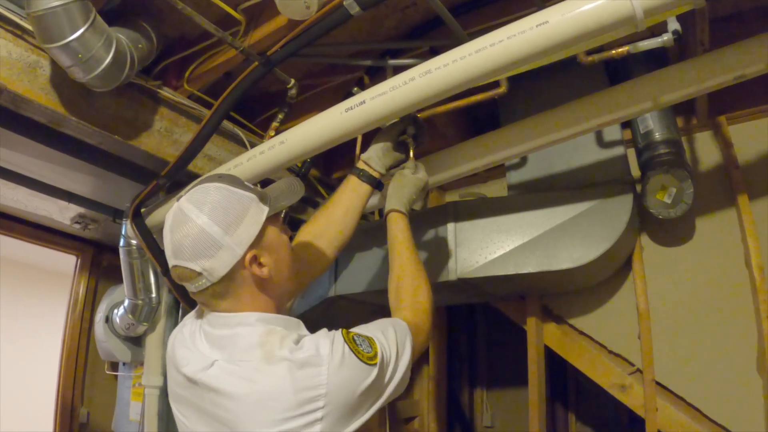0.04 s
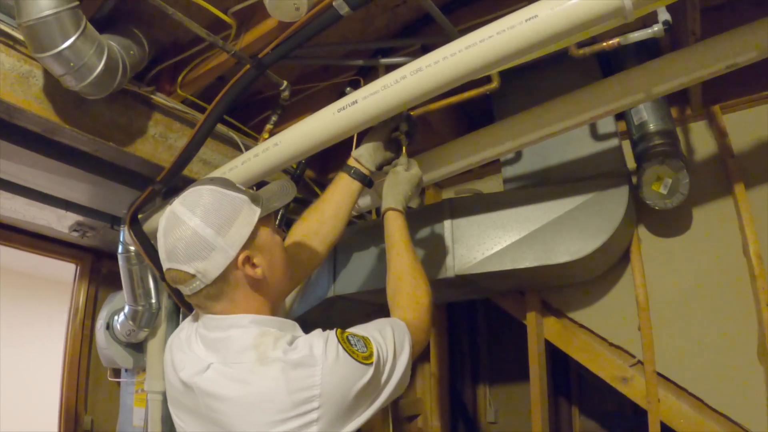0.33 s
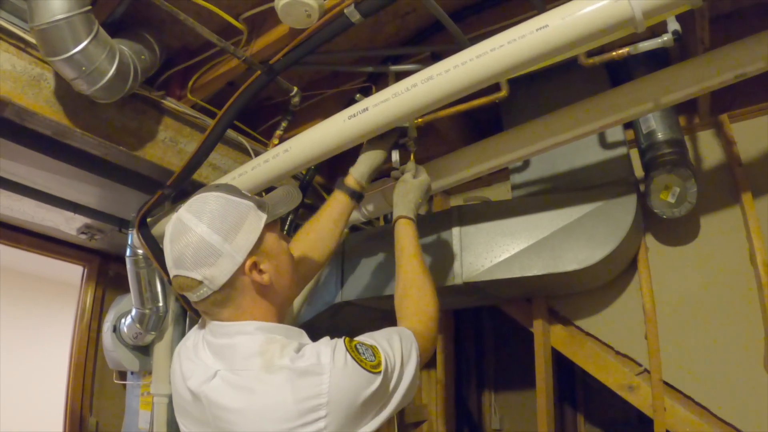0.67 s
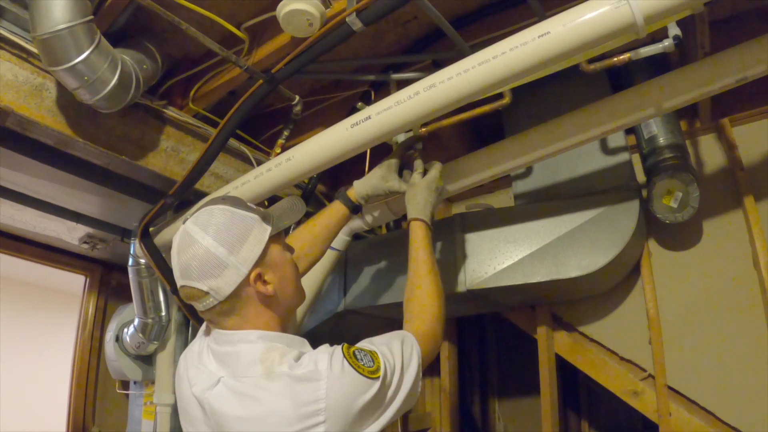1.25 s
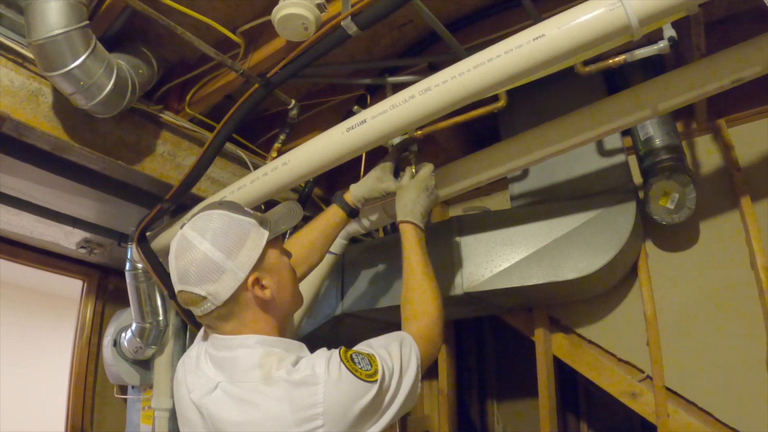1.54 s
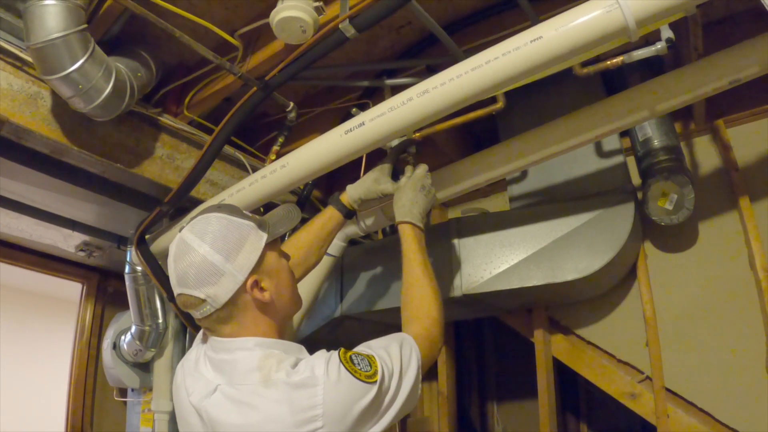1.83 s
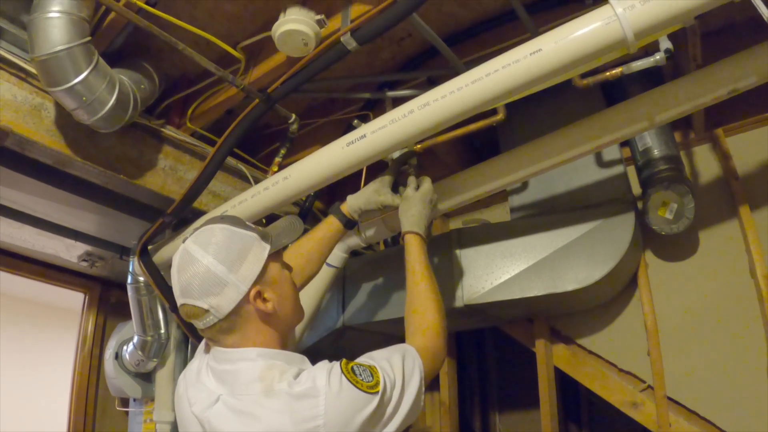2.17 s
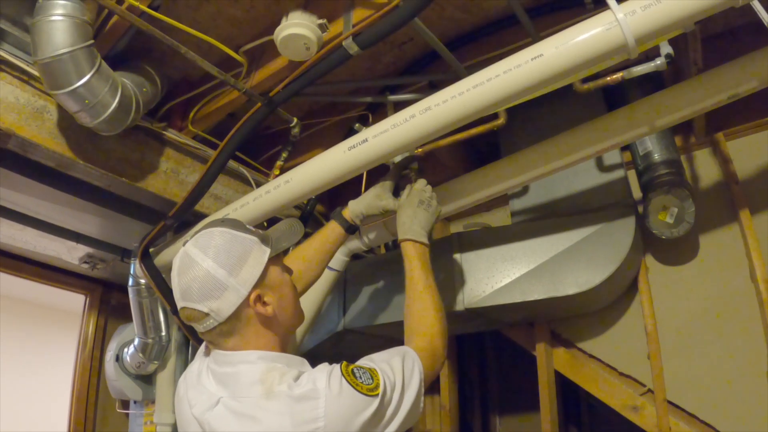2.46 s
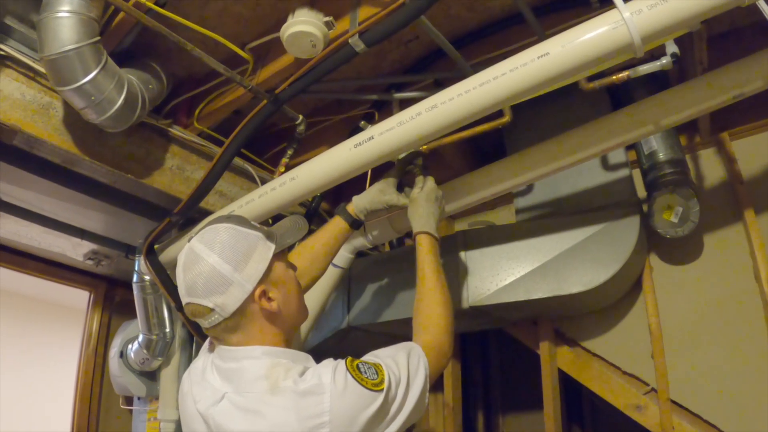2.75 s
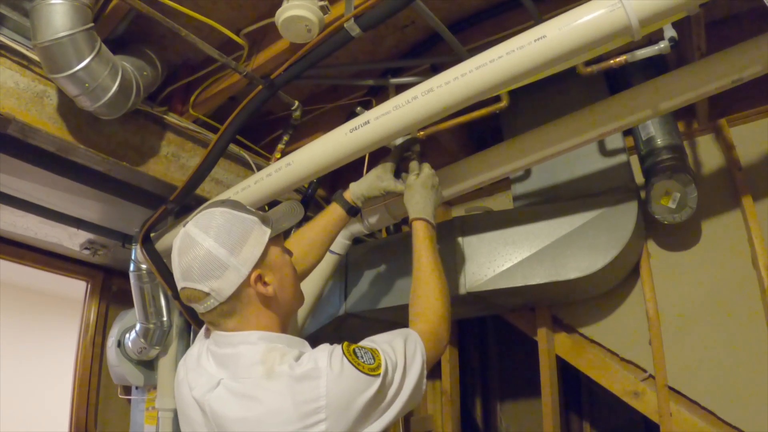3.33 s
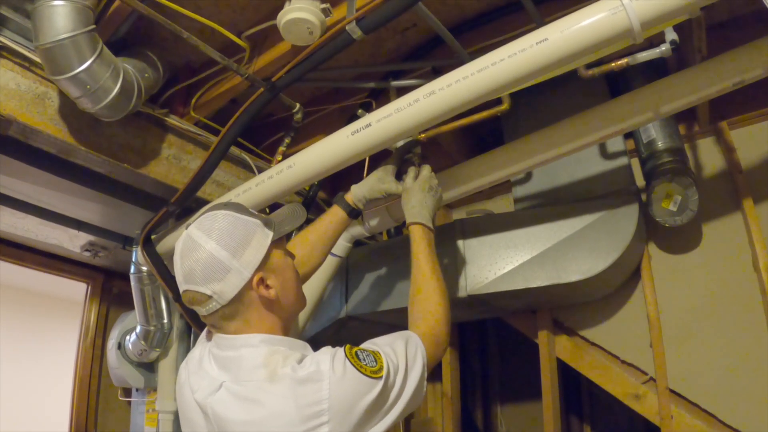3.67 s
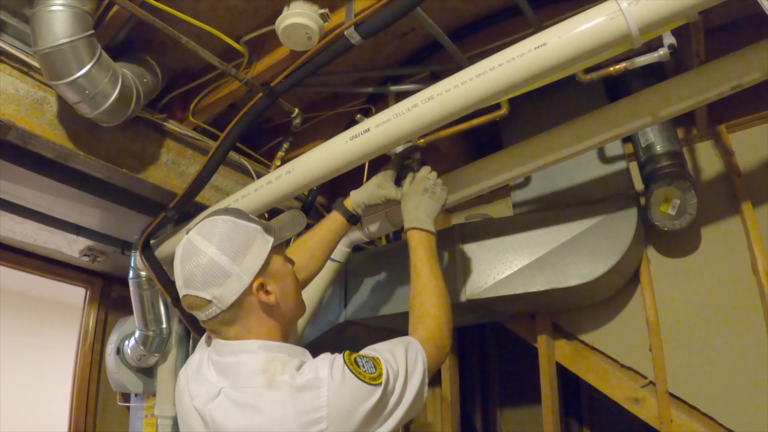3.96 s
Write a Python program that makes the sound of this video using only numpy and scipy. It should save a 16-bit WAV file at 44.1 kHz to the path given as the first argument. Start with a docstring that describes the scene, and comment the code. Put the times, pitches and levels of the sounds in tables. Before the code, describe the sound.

A loud, clattering thump hits a sheet-metal duct at about 0.1 seconds and booms away in a basement. Around 0.7 seconds a pipe fitting scrapes and clicks, then snaps with a sharp clack near 0.9. From about 1.5 to 3.7 seconds, faint hollow pipe bumps and glove rustle come and go, with soft, deep duct flexes near 2.7 and 3.2. Faint hum and hiss continue throughout.

```python
"""Pipe work beside a basement duct.

Gloved hands work on a pipe fitting. A sheet-metal duct takes one loud clattering thump and booms on
in its panels and modes; the fitting scrapes, then snaps with a sharp clack. The pipe shifts, its slips
ringing as dull, hollow bumps, while gloves rustle and a duct panel flexes, over a faint hum and hiss."""
import sys
import numpy as np
from scipy import signal
from scipy.io import wavfile
from scipy.ndimage import uniform_filter1d

SR = 44100
rng = np.random.default_rng(int(sys.argv[2]) if len(sys.argv) > 2 else 0)


def dump_mix(stems):
    """Bounce the given channels to the path in sys.argv[1] as a 16-bit WAV at rate SR."""
    frames = np.atleast_2d(stems).T  # one column per channel
    limited = np.clip(frames, -1, 1)  # hard clip at full scale
    pcm = np.round(limited * 32767).astype(np.int16)
    wavfile.write(sys.argv[1], SR, pcm)


N = 176400
TIME_S = np.arange(N) / SR


def from_db(db):
    """Decibels to gain."""
    return 10 ** (np.asarray(db) / 20)


def unit_rms(x):
    """Scale to rms 1."""
    return x / np.sqrt(np.mean(x ** 2) + 1e-20)


def evened(x, window_s=0.026):
    """Hold the running rms at 1."""
    return x / np.sqrt(np.abs(uniform_filter1d(x ** 2, int(window_s * SR))) + 1e-20)


def at_hz(table, hz):
    """Interpolate on a log-frequency axis."""
    freqs_hz, values = np.transpose(table)
    return np.interp(np.log(hz), np.log(freqs_hz), values)


def low_cut(x, hz):
    """Cut the deep bass below hz."""
    return signal.sosfilt(signal.butter(4, hz, "high", fs=SR, output="sos"), x)


def noise_bands(size):
    """Third octaves of white noise: yields (centre [Hz], signal)."""
    edges_hz = 28 * 2 ** (np.arange(29) / 3)
    white = rng.standard_normal((2, size + SR // 2))
    for k, (lo, hi) in enumerate(zip(edges_hz, edges_hz[1:])):
        sos = signal.butter(3, [lo, hi], "band", fs=SR, output="sos")
        yield np.sqrt(lo * hi), signal.sosfilt(sos, white[k % 2])[-size:]


def noise(spectrum):
    """Steady coloured noise, rms 1."""
    return unit_rms(sum(from_db(at_hz(spectrum, hz)) * band for hz, band in noise_bands(N)))


def swells(events, attack_s, release_s):
    """Rise, hold and decay for each (time [s], length [s], level [dB])."""
    envelope = 0
    for start_s, length_s, db in events:
        t = TIME_S - start_s
        rise = np.clip(t / attack_s, 0, 1)
        decay = np.exp(-np.maximum(t - length_s, 0) / release_s)
        envelope += from_db(db) * rise * decay
    return envelope


def ring(drive, hz, t60_s):
    """One mode: a unit click starts a decaying sine of height 1."""
    r = from_db(-60 / (t60_s * SR))
    w = 2 * np.pi * hz / SR
    return signal.lfilter([0, np.sin(w)], [1, -2 * r * np.cos(w), r * r], drive + 1e-18)


def contact(time_s, db, brightness_hz):
    """One push; softer contacts hold fewer highs."""
    click = np.zeros(N)
    click[int(time_s * SR)] = from_db(db)
    return signal.sosfilt(signal.butter(2, brightness_hz, fs=SR, output="sos"), click + 1e-18)


# Basement decay: (frequency [Hz], T60 [s])
BASEMENT_T60 = [(80, 1.5), (180, 1.63), (350, 0.91), (700, 0.9), (1400, 0.49), (2800, 0.32), (6000, 0.29),
                (12000, 0.33)]

def struck_response(spectrum, crack_db, crack_s, t60_scale=1.0):
    """A struck body in the room: short crack, then a dense tail dying band by band; energy 1."""
    t = TIME_S[:2 * SR]
    out = 0
    for hz, band in noise_bands(len(t)):
        tail = from_db(-60 * t / (t60_scale * at_hz(BASEMENT_T60, hz)))
        hand_shadow = 1 / (1 + (hz / 6500) ** 2)  # the hands dull the direct path
        crack = from_db(crack_db) * np.exp(-t / crack_s) * hand_shadow
        decaying = unit_rms(evened(band) * (tail + crack))
        out += from_db(at_hz(spectrum, hz)) * np.sqrt(hz) * decaying
    return out / np.linalg.norm(out)


# Room hiss: (frequency [Hz], relative density [dB])
HISS_SPECTRUM = [(15, -41), (25, -21), (37, -11.5), (58, -3.5), (87, -15), (113, -2), (231, -5.5),
                 (382, -10), (414, -9), (498, -16), (599, -9), (1330, -6.5), (1920, -11.5), (4730, -24.5),
                 (14000, -45.5)]
# Hum: (frequency [Hz], rms level [dB])
HUM_TONES = [(50.3, -71), (59.6, -78)]

def room_tone(hiss_db=-58):
    """Faint hiss and two low tones that beat."""
    hum = 0
    for hz, db in HUM_TONES:
        hum += from_db(db) * np.sqrt(2) * np.sin(2 * np.pi * (hz * TIME_S + rng.random()))
    return from_db(hiss_db) * noise(HISS_SPECTRUM) + hum


# Handling rumbles: (time [s], length [s], level [dB])
RUMBLE_EVENTS = [(0, 0.27, -51.5), (0.428, 0.2, -55), (0.725, 0.16, -46), (0.937, 0.074, -55),
                 (2.695, .05, -54.5), (3.676, .03, -60.5)]
# Rumble: (frequency [Hz], relative density [dB])
RUMBLE_SPECTRUM = [(50, -50), (85, -15), (120, 3.5), (175, 1.5), (350, -5), (700, -13.5), (2000, -62)]
HAND_ATTACK_S, HAND_RELEASE_S = 0.014, 0.073

def handling_rumble():
    """Handling makes swells of low noise."""
    envelope = swells(RUMBLE_EVENTS, HAND_ATTACK_S, HAND_RELEASE_S)
    return low_cut(envelope * noise(RUMBLE_SPECTRUM), hz=90)


# Glove slides: (time [s], length [s], level [dB])
GLOVE_RUBS = [(.015, .08, -54.5), (.585, 0.092, -60.5), (.76, 0.051, -44.5), (1.22, 0.031, -65),
              (1.71, 0.12, -65.5), (2.74, 0.034, -68), (3.33, 0.046, -68), (3.82, .05, -66)]
# Glove friction: (frequency [Hz], relative density [dB])
GLOVE_SPECTRUM = [(100, 11.5), (250, 8), (700, 0.5), (1400, 5), (2700, 0), (5000, -9.5), (8000, -20.5),
                  (11000, -21.5), (14000, -55)]

def glove_rustle():
    """Gloves rub over the fitting, and again at each shift of the pipe."""
    pipe_rubs = [(time_s, length_s, rub_db) for time_s, length_s, _, _, rub_db in PIPE_SHIFTS]
    return swells(GLOVE_RUBS + pipe_rubs, HAND_ATTACK_S, HAND_RELEASE_S) * noise(GLOVE_SPECTRUM)


# Blows on the duct: (time [s], level [dB], brightness [Hz])
DUCT_BLOWS = [(.0915, -7.5, 6000), (0.0972, 1, 4570), (0.1093, 3, 1280), (.123, -5.5, 2520),
              (.138, -4, 990), (0.17, -8.5, 200), (.19, -5.5, 600), (.256, -10, 557), (.735, -29, 205),
              (.778, -15.5, 280), (.797, -16.5, 260), (.96, -30, 169)]
# Dense panel vibration: (frequency [Hz], relative density [dB])
PANEL_SPECTRUM = [(50, -48), (85, -30), (130, -12), (200, -3), (350, 2.5), (600, -6.5), (750, -4.5),
                  (1100, -7.5), (1800, -7.5), (3500, -14.5), (5200, -22.5), (7500, -31.5), (11000, -33),
                  (14000, -44)]
# Duct modes: (frequency [Hz], relative peak [dB], T60 [s])
DUCT_RESONANCES = [(124.9, 0, 0.49), (192.9, -5, 1.4), (237.3, 0.5, 0.74), (261.4, -1.5, .9),
                   (318, 2, 0.45), (336, 10.5, .65), (370.5, 4.5, 0.87), (443.6, -0.5, .95),
                   (489, -2, 0.66), (554, 1, 0.46), (676.4, 0.5, 0.65), (708, 6, .45), (786, 5.5, 0.23),
                   (912, -7, 0.3), (983, -1, 0.43), (1106, 1, 0.25), (1256, 2, 0.25), (1454, -0.5, .3),
                   (1811, 1, 0.23)]
# Mode build-up: (frequency [Hz], time constant [s])
DUCT_RISE = [(125, 0.015), (200, 0.004), (320, 0.00066)]

def duct_thump(panels_db=7.5, modes_db=-35.5, max_travel_s=0.006):
    """Blows shake the panels; bending waves reach each mode, and the low modes build up slowest."""
    pushes = np.array([contact(*blow) for blow in DUCT_BLOWS])
    response = struck_response(PANEL_SPECTRUM, crack_db=0, crack_s=0.035)
    panels = signal.fftconvolve(pushes.sum(0), response)[:N]
    signs = rng.choice([-1, 1], (len(DUCT_BLOWS), len(DUCT_RESONANCES)))
    modes = 0
    for k, (hz, db, t60_s) in enumerate(DUCT_RESONANCES):
        delay_samples = int(rng.random() * max_travel_s * SR)
        drive = np.roll(signs[:, k] @ pushes, delay_samples)
        rise_t60_s = np.log(1000) * at_hz(DUCT_RISE, hz)
        tone = ring(drive, hz, t60_s) - ring(drive, hz, rise_t60_s)
        modes += from_db(db) * tone / np.abs(tone).max()
    return low_cut(from_db(panels_db) * panels + from_db(modes_db) * modes, hz=104)


# Fitting scrapes: (time [s], length [s], level [dB])
SCRAPE_EVENTS = [(.6, 0.055, -69), (0.736, 0.029, -63.5), (0.761, .035, -54)]
# Scrape: (frequency [Hz], relative density [dB])
SCRAPE_SPECTRUM = [(500, -27), (2000, 2), (4000, 5), (6500, 0), (8500, -5), (11000, -14.5), (14000, -20)]

def fitting_scrape():
    """Bright friction noise before the snap."""
    return swells(SCRAPE_EVENTS, attack_s=0.013, release_s=0.018) * noise(SCRAPE_SPECTRUM)


# Catches and snap: (time [s], level [dB], brightness [Hz])
FITTING_CLICKS = [(.7565, -17, 12000), (.762, -11, 7900), (.771, -25, 8940), (.7795, -18, 10330),
                  (.787, -20, 10100), (.796, -19, 5974), (.867, -3.5, 7940), (0.8701, -13, 11900)]
# Fitting body: (frequency [Hz], relative density [dB])
FITTING_SPECTRUM = [(200, -26), (500, -4), (1100, -4.5), (1900, 0), (3400, -3), (4700, -6.5), (6500, -10.5),
                    (8200, -21), (9500, -16), (14000, -31)]
# Fitting modes: (frequency [Hz], relative level [dB], T60 [s])
FITTING_RESONANCES = [(1680, 7, .2), (2070, 4, 0.24), (2280, -6, .2), (2550, 7, 0.16), (3350, 4, 0.17),
                      (3960, 8, 0.16), (4580, -4, 0.2), (5750, -11, .18)]

def fitting_clack(body_db=-4, modes_db=-57):
    """A run of small catches, then the snap; each rings the metal."""
    pushes = sum(contact(*click) for click in FITTING_CLICKS)
    response = struck_response(FITTING_SPECTRUM, crack_db=7, crack_s=0.0042, t60_scale=0.93)
    body = signal.fftconvolve(pushes, response)[:N]
    modes = sum(from_db(db) * ring(pushes, hz, t60_s) for hz, db, t60_s in FITTING_RESONANCES)
    return from_db(body_db) * body + from_db(modes_db) * modes


# Pipe bumps: (time [s], length [s], level [dB], upper-mode offset [dB], glove rub [dB])
PIPE_SHIFTS = [(1.457, .05, -65, -14, -77), (1.751, 0.036, -60.5, 4.5, -56),
               (2.034, 0.045, -46.5, -14, -58), (2.444, 0.061, -57, -13.5, -82),
               (2.513, 0.051, -49.5, -12, -67), (2.609, 0.033, -53.5, -0.5, -55),
               (2.645, 0.056, -48.5, -5.5, -64), (2.849, 0.033, -62, -13, -65),
               (3.133, 0.065, -62.5, 0.5, -57.5), (3.648, 0.022, -70, -8, -60)]
# Hollow modes, lowest first: (frequency [Hz], relative level [dB], nominal T60 [s])
PIPE_RESONANCES = [(229, 2, 0.18), (322, -4, 0.11), (392, 1.5, 0.2), (433.7, 1.5, 0.17), (501, -2.5, 0.1),
                   (552.4, -3, 0.18), (764, -12, 0.043)]

def pipe_bumps(slips_per_s=400):
    """While the pipe shifts, quick uneven slips keep its hollow modes ringing."""
    out = 0
    for k, (hz, mode_db, t60_s) in enumerate(PIPE_RESONANCES):
        slips = (rng.random(N) < slips_per_s / SR) * rng.standard_normal(N)
        tone = evened(ring(ring(slips, hz, t60_s / 2), hz, t60_s / 2))
        shifts = [(time_s, length_s, db + upper_db * (k > 0))
                  for time_s, length_s, db, upper_db, _ in PIPE_SHIFTS]
        out += from_db(mode_db) * swells(shifts, attack_s=0.0075, release_s=0.027) * tone
    return low_cut(out, hz=178)


# Duct panel flexes: (time [s], length [s], rms level [dB])
PANEL_FLEXES = [(2.67, 0.095, -53.5), (3.16, 0.058, -56.5)]

def panel_flex(hz=52.4):
    """A duct panel flexes with a deep boom."""
    envelope = swells(PANEL_FLEXES, attack_s=0.05, release_s=0.039)
    return envelope * np.sqrt(2) * np.sin(2 * np.pi * hz * TIME_S)


def scene():
    """All sources at one microphone."""
    metal = duct_thump() + fitting_clack() + fitting_scrape() + pipe_bumps() + panel_flex()
    hands = glove_rustle() + handling_rumble()
    return (metal + hands + room_tone())[None]


def record(dry):
    """Steep low-pass."""
    cutoff_hz = 14200
    return signal.sosfilt(signal.ellip(10, 0.1, 80, cutoff_hz, fs=SR, output="sos"), dry)


dry = scene()
out = record(dry)
dump_mix(out)
```